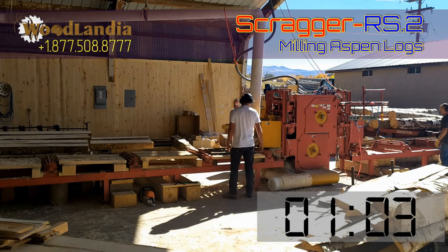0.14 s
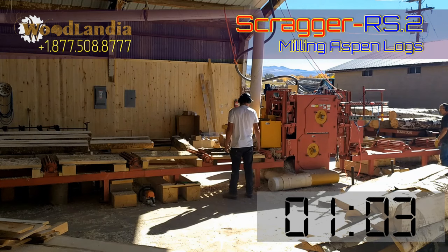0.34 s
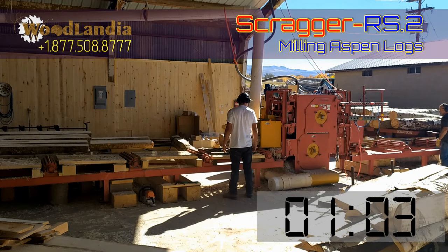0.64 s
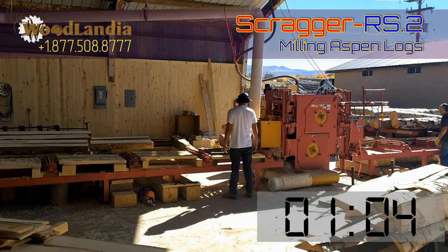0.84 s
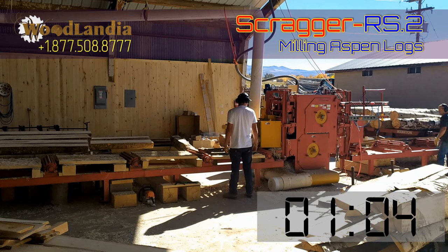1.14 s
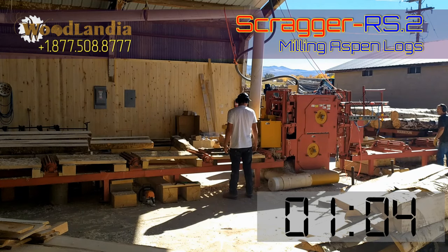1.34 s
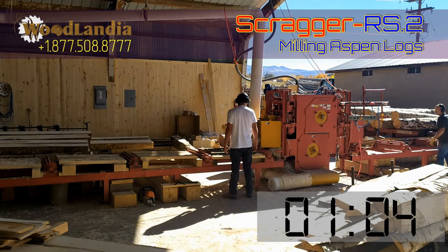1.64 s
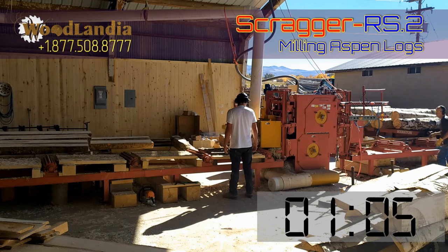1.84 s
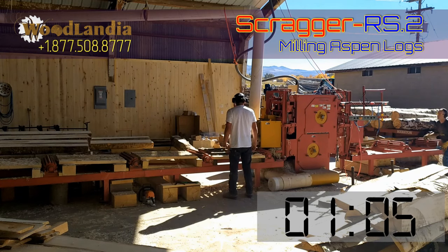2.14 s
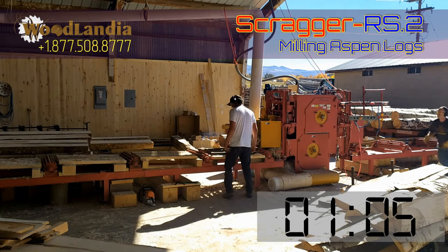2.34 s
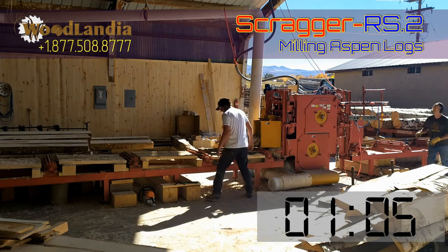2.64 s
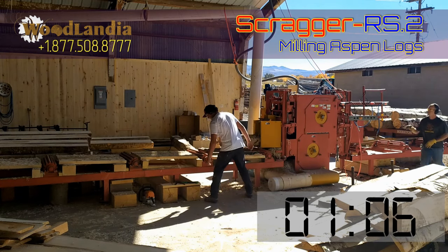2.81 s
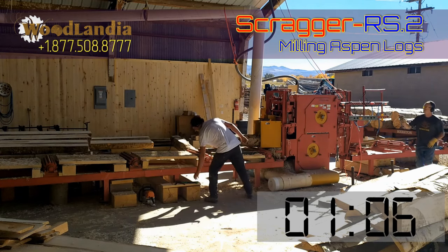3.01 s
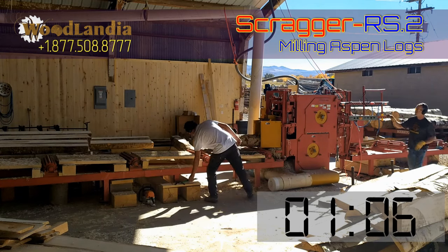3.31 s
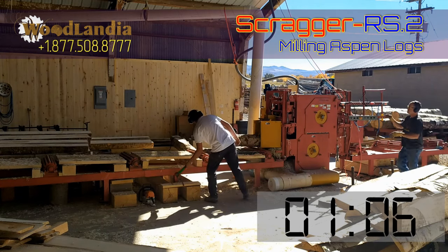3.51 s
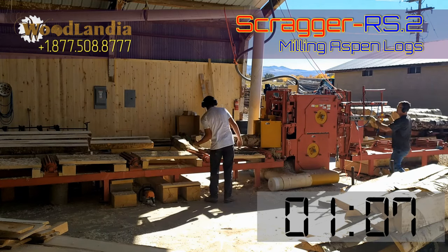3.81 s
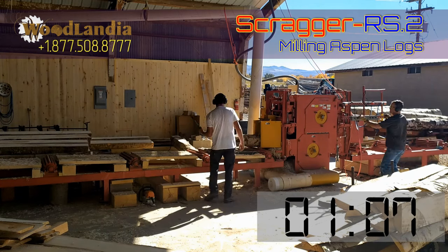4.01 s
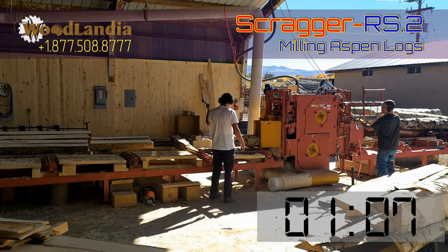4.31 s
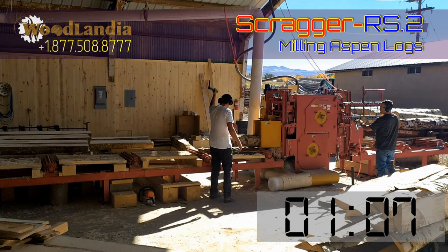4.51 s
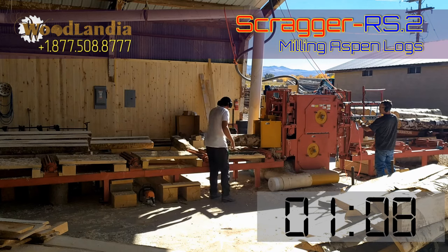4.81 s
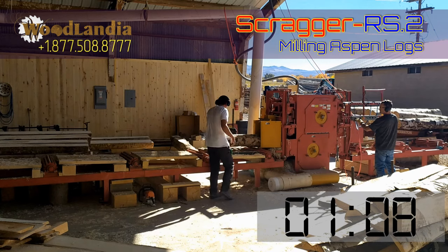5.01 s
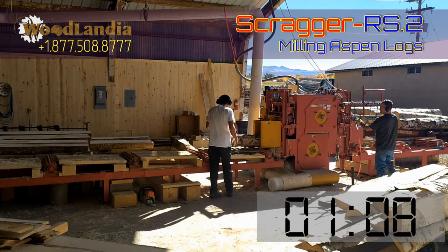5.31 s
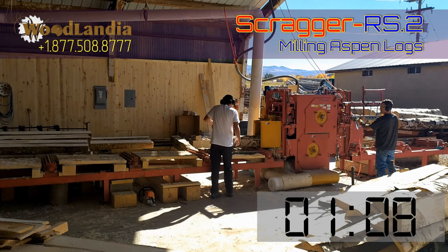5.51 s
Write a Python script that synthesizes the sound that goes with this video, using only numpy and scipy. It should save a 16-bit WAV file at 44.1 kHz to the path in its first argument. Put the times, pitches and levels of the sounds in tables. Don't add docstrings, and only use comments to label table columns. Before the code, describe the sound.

A sawmill motor drones and whines over broad blade wind, heard in stereo from a few metres away. Short air-valve hisses with hard metallic knocks interrupt it, leaving brief shed reverberation. A faint high guide squeak follows, then the saw cuts: the motor sags slightly, fibres tear, knots sing and splinters rap until the end.

```python
import sys
import numpy as np
from scipy import signal
from scipy.io import wavfile
from scipy.ndimage import uniform_filter1d

SR = 44100
rng = np.random.default_rng(int(sys.argv[2]) if len(sys.argv) > 2 else 0)


def natural_amplitude(level_db):
    exponent = np.asarray(level_db, float) / 20
    return 10 ** exponent


def master_out(mix):
    frames = np.transpose(np.atleast_2d(mix))
    ceiling = np.clip(frames, -1, 1)
    pcm = np.round(ceiling * 32767).astype(np.int16)
    wavfile.write(sys.argv[1], SR, pcm)


N = 249295
T = np.arange(N) / SR
IDLE_HZ = 59.97
RIGHT_LAG = 4

# order [multiple of speed], left level/dB, right level/dB, left lead/rad
IDLE_ORDERS = [(1, -43, -43, -0.3), (3, -35, -34, 0.1), (5, -36, -35, -0.1), (6, -42, -41, -0.7),
               (8, -50, -54, -0.4), (9, -44, -44, -0.5), (10, -46, -45, -2.5), (11, -47, -43, 0.2),
               (12, -43, -32, -2.1), (13, -48, -51, -0.7), (14, -45, -45, -1.8), (15, -28, -28, 0.6),
               (16, -51, -38, -1.9), (17, -39.5, -42.5, 0.8), (18, -32, -37, 0.3), (19, -44, -37, 1.7),
               (20, -40, -42, 0.7), (21, -33, -32, 2.3), (22, -50, -40, -1.0), (23, -51, -42, -0.6),
               (24, -39, -35, 0.7), (25, -53, -42, 1.4), (26, -47, -47, 0.7), (27, -46, -40, 2.5),
               (29, -58, -48, -0.2), (30, -44, -41, 2.7), (33, -50, -45, 2.8), (39, -46, -45, 0.9),
               (42, -48, -44, 1.7)]
# order [multiple of speed], left level/dB, right level/dB, left lead/rad
LOADED_ORDERS = [(5, -35, -32.5, 0.099), (6, -39, -40, -1.2), (9, -37, -36, -1.1), (11, -59, -57, 0.2),
                 (12, -45, -49, -1), (13, -58, -56, 0.5), (14, -32, -45, -1.4), (15, -34, -27.5, 0.74),
                 (16, -62, -62, -1.3), (18, -27.5, -36, 0.1), (20, -52, -44, 0.1), (21, -36, -29, 0.93),
                 (22, -51, -34.5, 0.9), (24, -36, -49, 1.9), (27, -41, -38, 0.6), (30, -37, -45.5, 1.2),
                 (32.7, -51, -52, .5), (33, -54, -58, -0.2)]
# t/s, level/dB
FIFTH_SHAKE = [(0.0, -35), (0.61, -34), (0.64, -27), (0.77, -47), (0.88, -25.5), (1.43, -43), (2.39, -27.5),
               (2.45, -43), (2.52, -27), (3.01, -41), (3.04, -27.5), (3.59, -37), (4.33, -27.5),
               (4.37, -48.5), (4.42, -26.5), (4.78, -37.5), (4.97, -27.5), (5.65, -35.5)]
# order [multiple of shaft speed], level/dB, left lead/rad
SHAFT_ORDERS = [(5, -42.5, -0.36), (8, -42.5, 0.8), (13, -47, -0.054), (26, -45, 0.85), (28, -44.5, 1),
                (40, -44, 1), (71.2, -56, 1)]
# t/s, air noise level/dB, motor whine level/dB
NEARNESS = [(0, 2.5, 3), (.3, 3.5, 2.5), (.65, 2, 2), (1.1, 0.7, 1.5), (1.8, 0.8, 0.3), (2.4, -0.1, -1),
            (3.0, -1, 0.5), (3.35, 0, 1), (3.6, -1.5, -0.5), (3.9, -0.5, 1), (4.15, -.4, -3.5),
            (4.4, 0, -1.5), (5.66, -5.5, -3)]
# f/Hz, level/dB (per Hz)
FRAME_SPECTRUM = [(40, -26), (60, -5), (100, -6.5), (160, -2.5), (250, -7.5), (350, -6), (480, -12),
                  (620, -15), (800, -7.5), (1100, -12.5), (1500, -13), (1900, -18.5), (2600, -15.5)]
# f/Hz, level/dB (per Hz)
WIND_SPECTRUM = [(1200, -10.5), (1700, -10), (2400, -7.5), (3200, -7.5), (4200, -9), (5700, -13),
                 (7000, -11.5), (9000, -11), (10500, -19), (12500, -23), (15000, -45)]
# t/s (opens), open time/s, jet level/dB, port f/Hz, port whistle level/dB
AIR_VENTS = [(0.327, 0.097, -25, 2910, 10), (0.724, 0.088, -21.5, 2570, 6), (.83, 0.018, -31.5, 2540, 18),
             (1.25, 0.022, -33, 2510, -3), (1.7, 0.044, -32, 2500, -10), (1.92, 0.033, -37, 2500, 11),
             (2.762, 0.02, -25, 2940, 13), (2.785, 0.063, -23, 3150, 3), (2.865, 0.017, -36, 3160, 20),
             (4.128, 0.051, -21, 2720, 9), (4.182, 0.01, -37, 2370, 21), (4.215, 0.081, -43, 2480, 23),
             (0.714, 0.008, -40, 1900, 5)]
# f/Hz, level/dB (per Hz)
JET_SPECTRUM = [(800, 5.5), (1400, -2.5), (2000, 0), (3000, -1), (4500, -1), (6500, -2), (9000, -7),
                (10500, -35), (13000, -33)]
# t/s, level/dB, f/Hz, width/Hz
STEEL_HITS = [(.333, -22, 2000, 2000), (.724, -29, 2550, 500), (0.749, -22, 2600, 400),
              (2.785, -33, 3000, 1200), (4.126, -20.5, 2900, 1000), (.343, -19, 1350, 500),
              (2.81, -34, 1500, 900), (4.14, -22, 1700, 900), (4.18, -29, 2000, 600),
              (4.914, -30, 2600, 900), (5.0, -29, 5300, 1500), (5.072, -20, 3850, 900),
              (5.101, -25, 2510, 500), (5.213, -30, 2700, 600), (5.299, -26, 4200, 1000),
              (5.541, -27, 1200, 400), (5.612, -20, 2690, 600)]
# t/s (middle), half length/s, f/Hz,
# level/dB
SINGING_TONES = [(3.897, 0.18, 3780, -39), (4.69, .05, 774, -31), (4.74, .05, 717, -33),
                 (5.03, .08, 1960, -36), (5.02, .05, 1075, -30), (4.71, .07, 1075, -32),
                 (4.76, 0.046, 883, -25), (4.8, .1, 1255, -30), (4.843, .08, 790, -34),
                 (4.943, 0.12, 758, -31), (5.07, .08, 1615, -31), (5.08, 0.049, 720, -27),
                 (5.148, 0.12, 714, -31), (5.327, 0.065, 790, -31), (5.438, .1, 1140, -38),
                 (5.58, 0.095, 846, -35)]
# t/s (middle), f/Hz, level/dB, side [0 left, 1 right]
BLADE_PINGS = [
    (4.445, 13677, -42, 0),
    (5.163, 13800, -48, 1),
    (5.378, 14471, -40, 0),
]
# t/s, tearing level/dB, motor effort level/dB, rasp level/dB
BITES = [
    (4.62, -3, -3, -1),
    (4.72, 0, -4, -0.5),
    (4.82, 3.5, -6, 0.5),
    (4.93, 3, -1.5, 0.5),
    (5.01, 2.5, 0, 2),
    (5.09, -4, 5, -0.5),
    (5.25, 4, -3, 0.5),
    (5.37, 0, 4, 0),
    (5.66, -1, -1.5, 0.5),
]
# f/Hz, level/dB (per Hz)
ROAR_SPECTRUM = [(250, 10), (350, 0), (500, -1), (750, -2.5), (1000, -3), (1400, -1), (2000, -29)]
# f/Hz, level/dB (per Hz)
RASP_SPECTRUM = [(940, -9), (1600, 1.5), (1880, -17), (1930, -3), (2070, -2.5), (4190, -4), (6000, -8),
                 (8320, -6), (12500, -20.5), (16200, -46), (22000, -120)]
# f/Hz, width/Hz, level/dB
LOG_RESONANCES = [(290, 22, -15), (650, 53, -23), (708, 29, 4), (768, 27, -4), (844, 110, -3),
                  (960, 52, -23), (1250, 57, -13), (1625, 30, -1), (1930, 50, -18)]
# f/Hz, share common to both [0 to 1]
STEREO_LIKENESS = [(60, 0.89), (150, 0.9), (300, 0.8), (600, 0.44), (1200, 0.25), (2500, 0.17),
                   (5000, 0.28), (12000, 0.017)]
# f/Hz, left minus right level/dB
STEREO_BALANCE = [(60, 1), (170, 1), (500, 1), (1440, -1), (4160, -1.5), (12000, 2)]
# f/Hz, threshold [spreads of chance]
STARVED_BANDS = [(1500, -4), (2600, -1.6), (5500, -1.05), (8500, -1.25), (9800, -.6), (11000, .1),
                 (12500, .9), (13200, .9), (13400, -4)]
# f/Hz, share of a common swing [0 to 1]
TOP_SHORTAGE = [(4000, .15), (9000, .25), (11000, .8), (13000, 1.0)]


def rms_one(x):
    return x / np.sqrt(np.mean(x ** 2) + 1e-20)


def in_time(rows):
    s, *columns = np.transpose(rows)
    return [np.interp(T, s, c) for c in columns]


def at_hz(points, hz):
    table = np.array(points)
    return np.interp(np.log(hz), np.log(table[:, 0]), table[:, 1])


def ramp(start_s, rise_s):
    return np.clip((T - start_s) / max(rise_s, .002), 0, 1)


def bump(t, middle_s, half_s):
    return np.cos(np.pi / 2 * np.clip((t - middle_s) / half_s, -1, 1)) ** 2


def drift(rate):
    r = np.exp(-80 * np.pi * rate / SR)
    noise = rng.standard_normal(N // 40 + 2002)
    slow = signal.lfilter([1], [1, -2 * r, r * r], noise)[2000:]
    return np.interp(np.arange(N) / 40, np.arange(len(slow)), rms_one(slow))


def resonance(x, hz, width_hz):
    r, w = np.exp(-np.pi * width_hz / SR), 2 * np.pi * hz / SR
    return signal.lfilter([(1 - r * r) / 2, 0, (r * r - 1) / 2], [1, -2 * r * np.cos(w), r * r], x)


def banded(spectrum, patchy_db, start=0):
    octaves = np.log2(spectrum[-1][0] / spectrum[0][0])
    edges = spectrum[0][0] * 2 ** np.arange(0, octaves + .2, 1 / 3)
    edges = edges[edges < 17000]
    white = rng.standard_normal((2, 3, N - start + RIGHT_LAG))
    out, together = 0, drift(0.66)
    for k, (low, high) in enumerate(zip(edges, edges[1:])):
        band = signal.butter(2, [low, high], "band", fs=SR, output="sos")
        common, left, right = signal.sosfilt(band, white[k % 2])
        hz = np.sqrt(low * high)
        alike = np.clip(at_hz(STEREO_LIKENESS, hz), 0, 1)
        shared = np.sqrt(alike) * np.array([common[RIGHT_LAG:], common[:-RIGHT_LAG]])
        own = np.sqrt(1 - alike) * np.array([left, right])[:, RIGHT_LAG:]
        flicker_db = patchy_db * (0.12 * together + drift(13.0))[start:]
        balance = natural_amplitude(at_hz(STEREO_BALANCE, hz) / 2 * np.array([[1], [-1]]))
        out = out + natural_amplitude(at_hz(spectrum, hz) + flicker_db) * balance * (shared + own)
    return np.pad(rms_one(out), ((0, 0), (start, 0)))


def motor_turn(load):
    sag_hz = .175
    return 2 * np.pi * np.cumsum(IDLE_HZ - sag_hz * load) / SR


def order_swing(order, fifth_db, flutter_db, flutter_rate):
    if order == 5:
        return fifth_db + 2.5 * drift(2.9)
    return flutter_db * drift(flutter_rate)


def order_tone(order, turn, left_db, right_db, lead, waver):
    middle = natural_amplitude(left_db) * np.exp(1j * lead) + natural_amplitude(right_db)
    free = 1.8 * rng.standard_normal() * (order % 3 > 0 or order > 21)
    phase = order * turn - np.angle(middle) - np.pi / 2 + free + waver
    return np.sqrt(2) * np.array([natural_amplitude(left_db) * np.sin(phase + lead), natural_amplitude(right_db) * np.sin(phase)])


def idling_motor(turn, load, near_db, fifth_db):
    out = np.zeros((2, N))
    ninth_db = 9 * (ramp(3, .25) - .5)
    for order, left_db, right_db, lead in IDLE_ORDERS:
        swing_db = order_swing(order, fifth_db, 0.9, 3.0)
        swing_db = swing_db + near_db * (1 if order in (15, 18, 24) else -0.064)
        if order == 9:
            swing_db = swing_db + ninth_db
        out += natural_amplitude(swing_db) * order_tone(order, turn, left_db, right_db, lead, .3 * drift(3.0))
    return (1 - load) * out


def upper_orders(turn, load):
    out = np.zeros((2, N))
    for order in range(45, 111, 3):
        scatter_db = 1.2 * rng.standard_normal((2, 1)) + 3 * drift(3)
        level = natural_amplitude(-46.5 - order / 15 + scatter_db + 2 * load)
        lead = 2 * np.pi * order * IDLE_HZ * RIGHT_LAG / SR + 1.2 * rng.standard_normal()
        phase = order * turn + rng.uniform(0, 2 * np.pi)
        out += np.sqrt(2) * level * np.sin(phase + [[lead], [0]])
    return out


def slow_shaft(turn):
    out = np.zeros((2, N))
    for order, level_db, lead in SHAFT_ORDERS:
        phase = round(order) * turn / 3 + 1.5 * drift(2.5)
        out += np.sqrt(2) * natural_amplitude(level_db + 4.4 * drift(6.9)) * np.sin(phase + [[lead], [0]])
    return out


def frame_rumble(load, near_db):
    return natural_amplitude(-25.5 + 0.15 * near_db + 1 * load) * banded(FRAME_SPECTRUM, patchy_db=-0.35)


def blade_wind(turn, load, near_db):
    wind = natural_amplitude(-27.5 + near_db + 0.5 * load) * banded(WIND_SPECTRUM, patchy_db=1.66)
    return wind * (1 + 0.049 * np.cos(3 * turn))


def vents():
    jet, out = banded(JET_SPECTRUM, patchy_db=0.66), np.zeros((2, N))
    for opens, held, jet_db, port_hz, port_db in AIR_VENTS:
        part = slice(int(opens * SR), int((opens + held + 1) * SR))
        t, air = T[part] - opens, jet[:, part]
        after = np.maximum(t - held, 0)
        shed_ring, line_bleed = 0.69 * natural_amplitude(-60 * after / 0.79), 0.28 * np.exp(-after / 0.0059)
        whistle = natural_amplitude(port_db) * resonance(air, port_hz, width_hz=135) * np.exp(-t / 0.16)
        shrill = natural_amplitude(6.5) * resonance(air, 9250, width_hz=1900) * np.exp(-t / 0.065)
        opening = np.clip(t / 0.0033, 0, 1)
        burst = 1 + 0.11 * np.exp(-t / 0.051)
        envelope = natural_amplitude(jet_db) * opening * (shed_ring + line_bleed) * burst
        out[:, part] += envelope * (air + whistle + shrill)
    return out * natural_amplitude([[-.7], [.7]])


def slams():
    t60_s = 0.11
    out = np.zeros((2, N + SR))
    t = np.arange(SR // 4) / SR
    for s, db, hz, width in STEEL_HITS:
        common, own = rng.standard_normal((1, len(t))), rng.standard_normal((2, len(t)))
        rattle = rms_one(resonance(resonance(common + own, hz, width), hz, 2 * width))
        start = int(s * SR)
        out[:, start:start + len(t)] += natural_amplitude(db - 60 * t / t60_s) * rattle
    return out[:, :N]


def guide_squeak(turn):
    start_s, rise_s, end_s = 3.6, .25, 4.6
    rub = ramp(start_s, rise_s) * (1 - ramp(end_s, rise_s))
    rub_db = -44 - 4 * np.maximum(T - start_s - rise_s, 0)
    return np.sqrt(2) * rub * natural_amplitude(rub_db) * np.sin(63 * turn)


def singing_tones():
    out = np.zeros((2, N))
    for middle, length, hz, db in SINGING_TONES:
        phase = 2 * np.pi * hz * T + 1.16 * drift(11.0)
        lead = rng.normal(.5, 0.43)
        out += np.sqrt(2) * natural_amplitude(db) * bump(T, middle, length) * np.sin(phase + [[lead], [0]])
    return out


def pings():
    out = np.zeros((2, N))
    for middle, hz, db, side in BLADE_PINGS:
        out[side] += natural_amplitude(db) * bump(T, middle, .045) * np.sin(2 * np.pi * hz * T)
    return out


def cut(turn, tearing_db, rasp_db):
    start_s = BITES[0][0]
    start = int(start_s * SR)
    teeth = 1 + 0.026 * np.cos(3 * turn)
    entering = np.clip((T - start_s) / 0.084, 0, 1)
    tearing = banded(ROAR_SPECTRUM, patchy_db=2.5, start=start)
    rings = 0
    for hz, width, db in LOG_RESONANCES:
        rings = rings + natural_amplitude(db + 3.5 + 1.1 * drift(9.1)) * resonance(tearing, hz, width)
    roar = natural_amplitude(-26 + tearing_db) * (0.32 * tearing + rings)
    rasp = natural_amplitude(-21.5 + rasp_db) * banded(RASP_SPECTRUM, patchy_db=1.5, start=start)
    return entering * teeth * (roar + rasp)


def loaded_motor(turn, load, effort_db, fifth_db):
    out = np.zeros((2, N))
    shallow_db = -10 * (1 - ramp(5.11, 0.31))
    for order, left_db, right_db, lead in LOADED_ORDERS:
        order = round(order)
        swing_db = order_swing(order, fifth_db, 3.0, 8.0)
        if order in (18, 21):
            swing_db = swing_db / 2 + shallow_db
        if order > 9:
            swing_db = swing_db + 1.1 * effort_db
        out += natural_amplitude(swing_db) * order_tone(order, turn, left_db, right_db, lead, .7 * drift(8.0))
    return load * out


def starve(x):
    shift = 147
    padded = np.pad(x, ((0, 0), (shift, 0)))
    hz, _, frames = signal.stft(padded, SR, "cosine", 2048, 1024)
    count = frames.shape[2]
    chance = rms_one(uniform_filter1d(rng.standard_normal((2, 257, count)), size=3, axis=2))
    chance = np.repeat(chance, 4, axis=1)[:, :len(hz)]
    short = rms_one(uniform_filter1d(rng.standard_normal((2, 1, count)), size=3, axis=2))
    threshold = at_hz(STARVED_BANDS, hz + 1)[:, None] + at_hz(TOP_SHORTAGE, hz + 1)[:, None] * short
    gain = np.where(chance < threshold, natural_amplitude(-24), 1)
    power = uniform_filter1d(np.mean(gain ** 2, axis=(0, 2)), size=41)
    gain = gain / np.sqrt(power)[:, None]
    return signal.istft(frames * gain, SR, "cosine", 2048, 1024)[1][:, shift:shift + N]


def scene():
    load = ramp(4.66, 0.14)
    near_db, whine_db = in_time(NEARNESS)
    tearing_db, effort_db, rasp_db = in_time(BITES)
    fifth_db = in_time(FIFTH_SHAKE)[0] + 33
    turn = motor_turn(load)
    mill = idling_motor(turn, load, whine_db, fifth_db) + upper_orders(turn, load) + slow_shaft(turn)
    mill += frame_rumble(load, near_db) + blade_wind(turn, load, near_db)
    mill += vents() + slams() + guide_squeak(turn) + singing_tones()
    mill += cut(turn, tearing_db, rasp_db) + loaded_motor(turn, load, effort_db, fifth_db)
    air = signal.butter(10, 12900, fs=SR, output="sos")
    return signal.sosfilt(air, mill) + pings()


def roll_off(x):
    return signal.sosfilt(signal.butter(12, 14600, fs=SR, output="sos"), x)


def record(dry):
    gap_s, recover_s, gap_db = 4.889, .012, -12
    x = signal.sosfilt(signal.butter(8, 54, "high", fs=SR, output="sos"), dry)
    since = np.maximum(T - gap_s, 0)
    recovering_db = gap_db * np.clip(1 - (since / recover_s) ** 1.5, 0, 1)
    dip_db = np.where(since > 0, recovering_db, 0)
    mix = starve(x) * natural_amplitude(dip_db)
    return roll_off(mix)


dry = scene()
out = record(dry)
master_out(out)
```